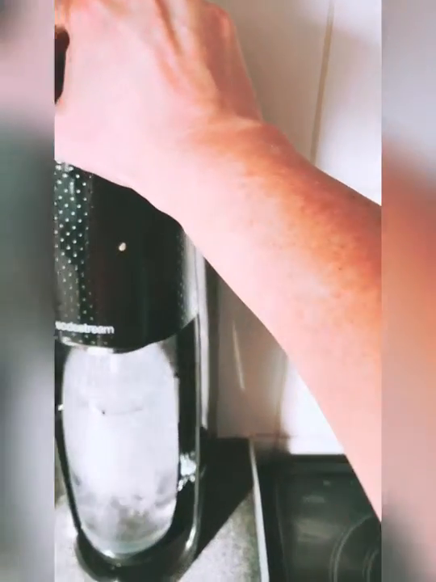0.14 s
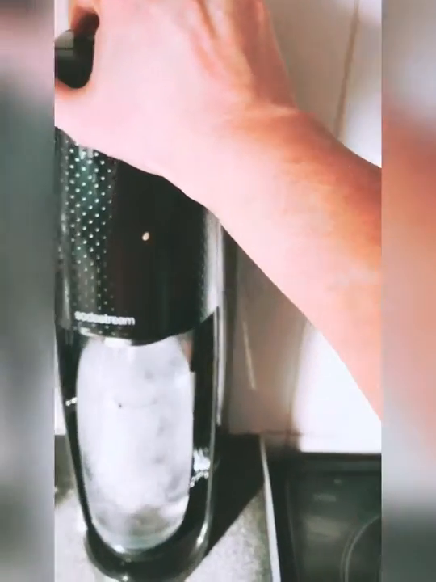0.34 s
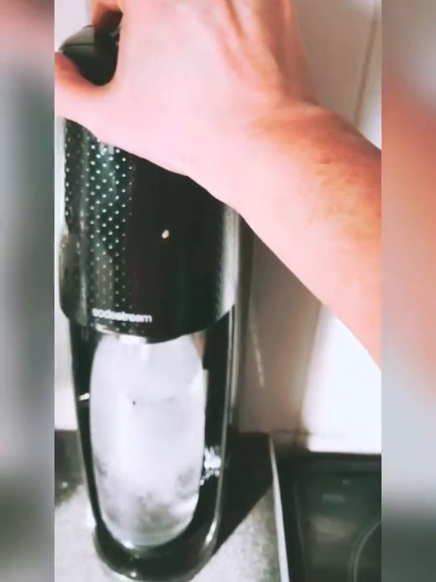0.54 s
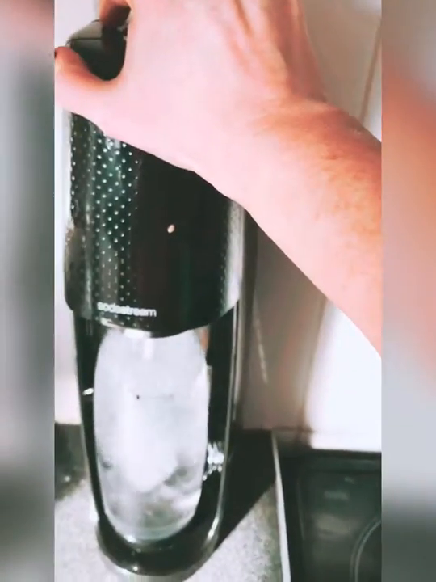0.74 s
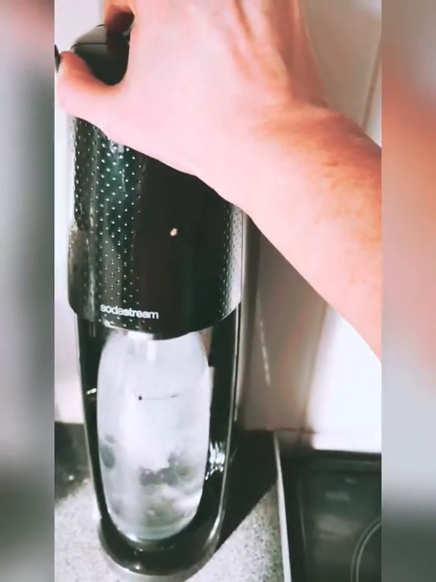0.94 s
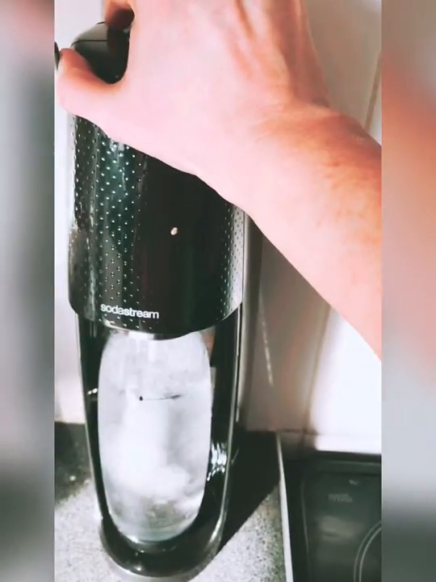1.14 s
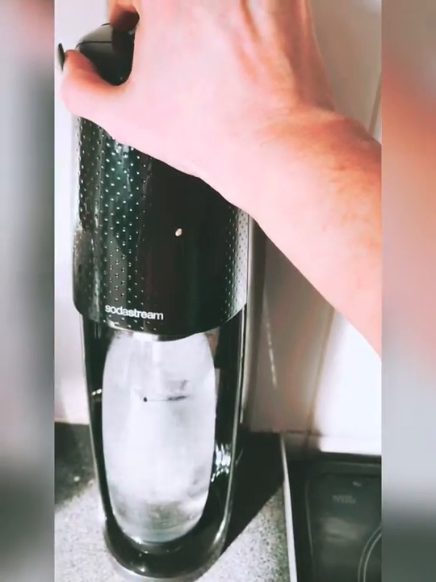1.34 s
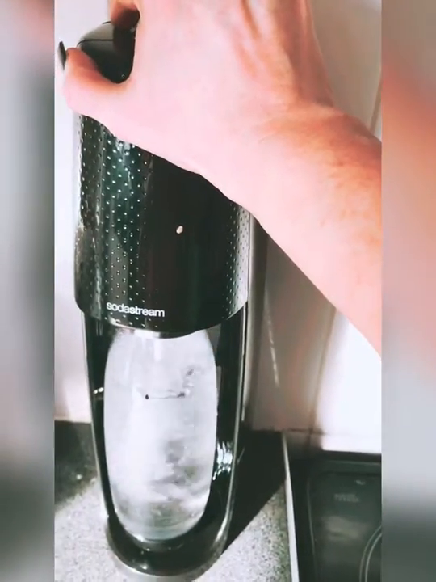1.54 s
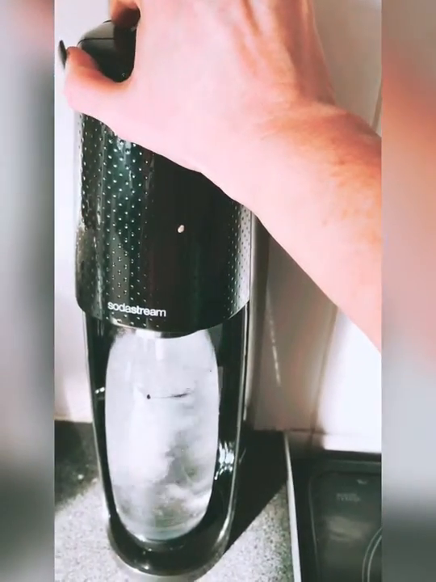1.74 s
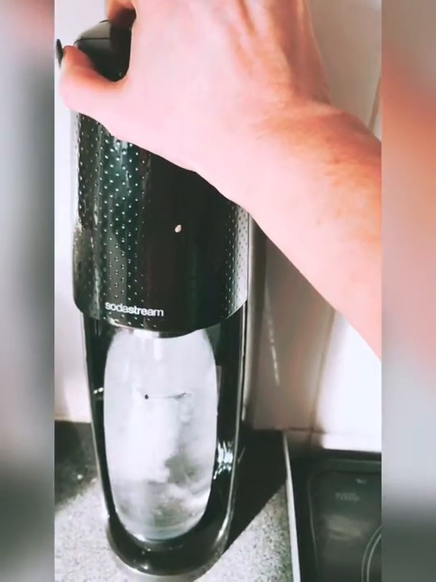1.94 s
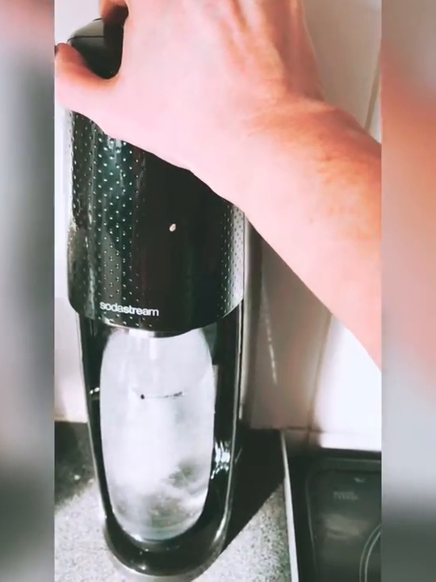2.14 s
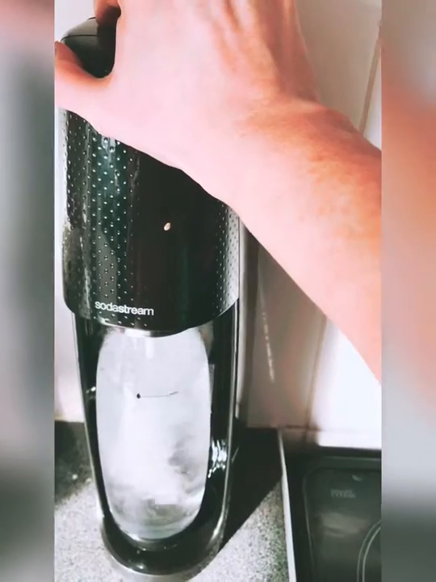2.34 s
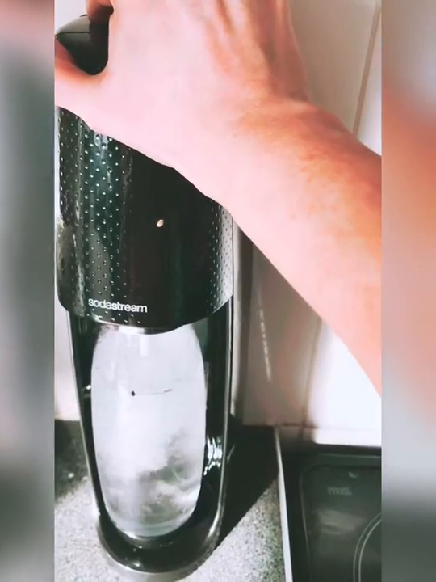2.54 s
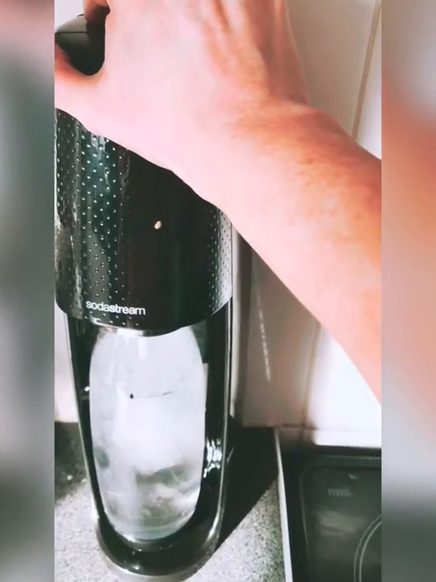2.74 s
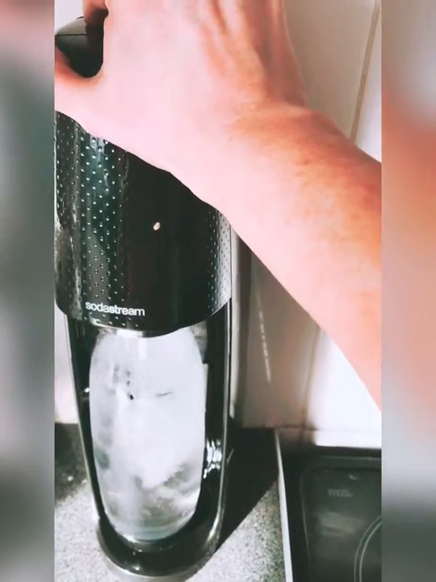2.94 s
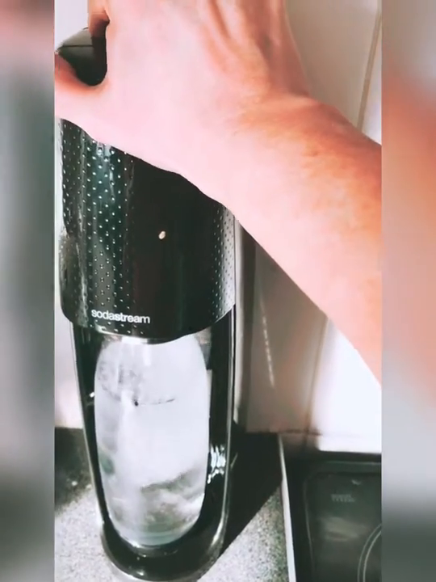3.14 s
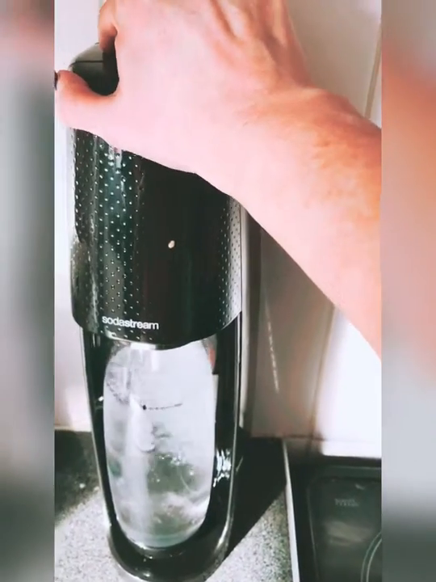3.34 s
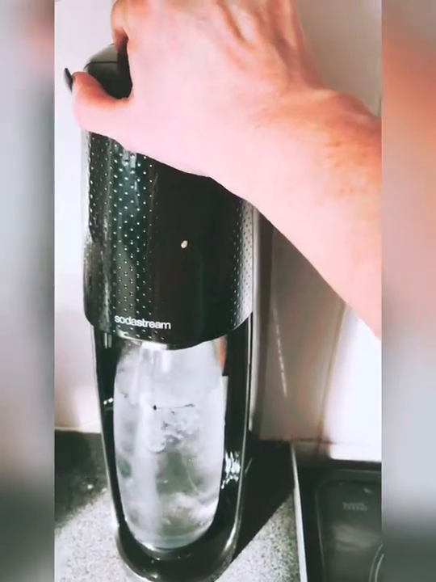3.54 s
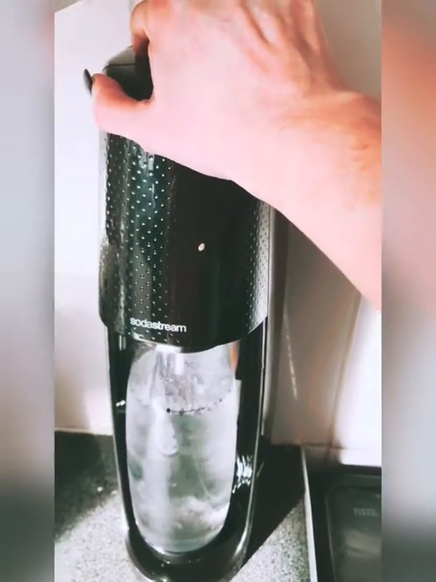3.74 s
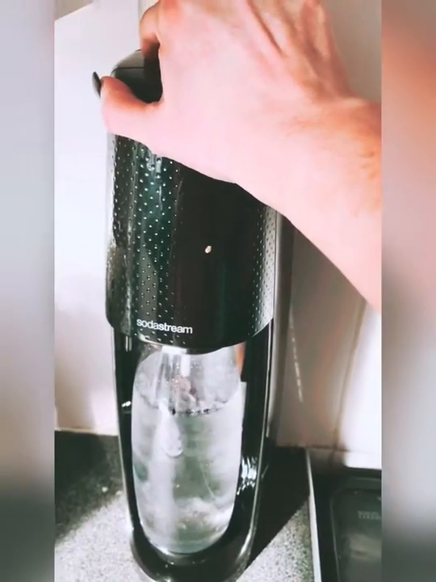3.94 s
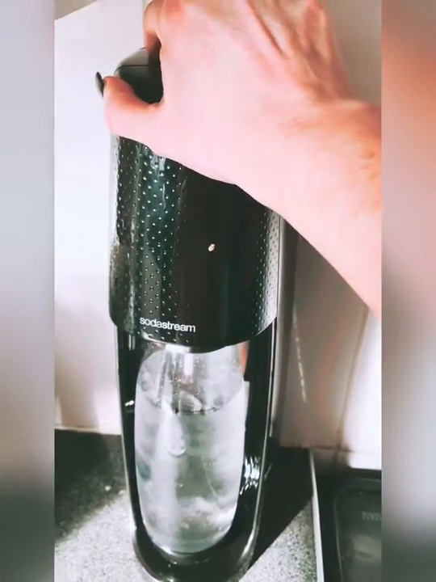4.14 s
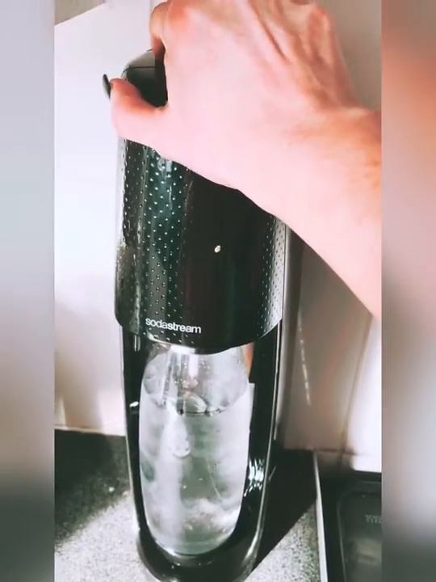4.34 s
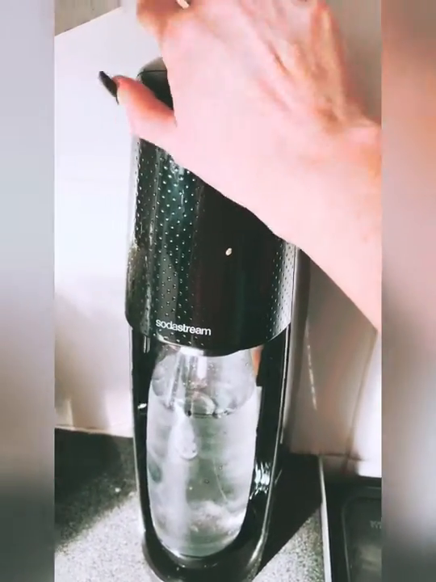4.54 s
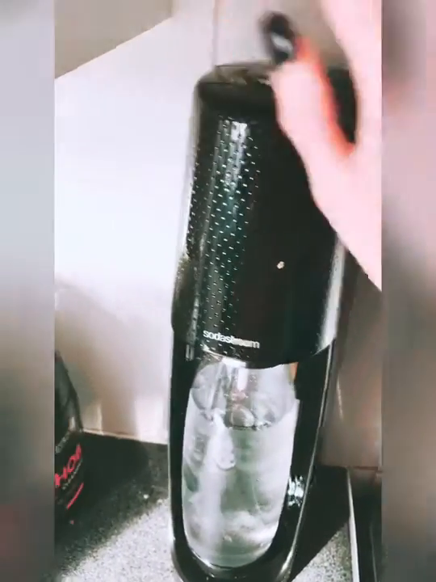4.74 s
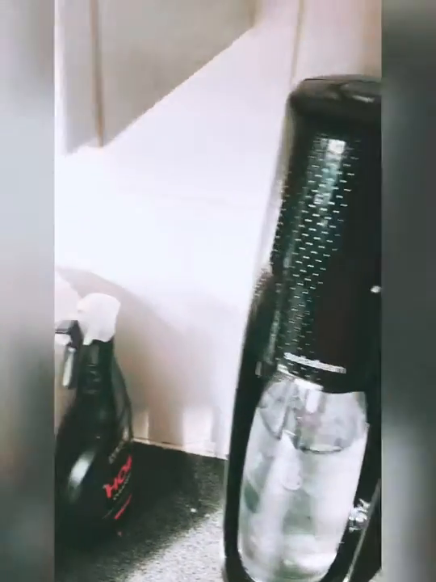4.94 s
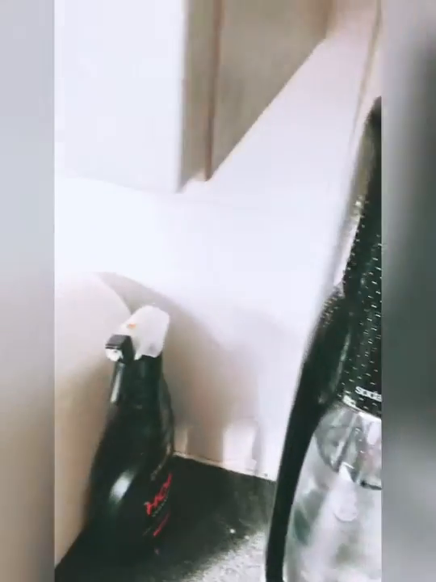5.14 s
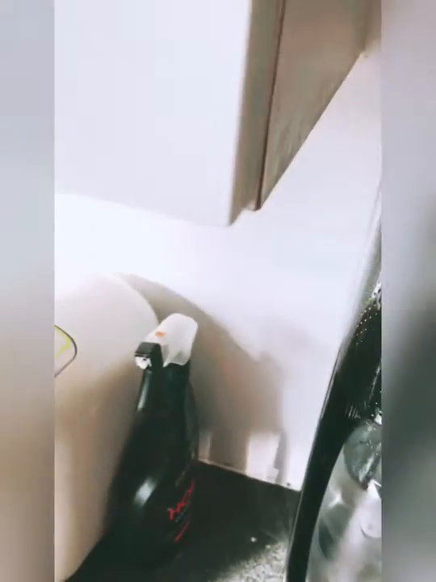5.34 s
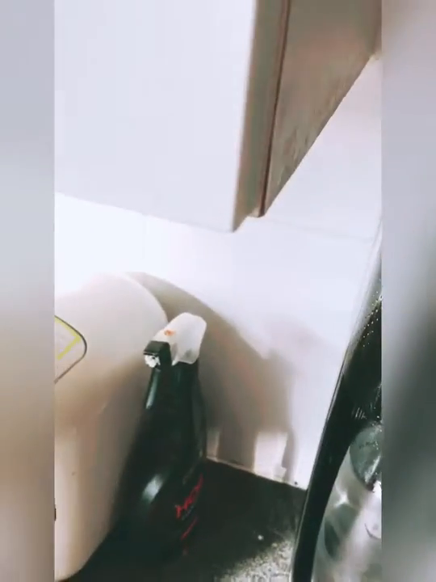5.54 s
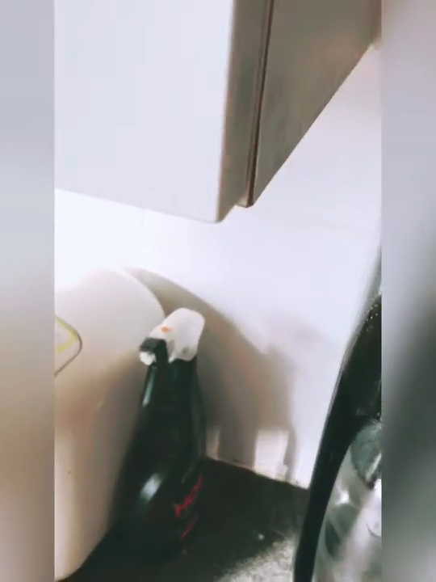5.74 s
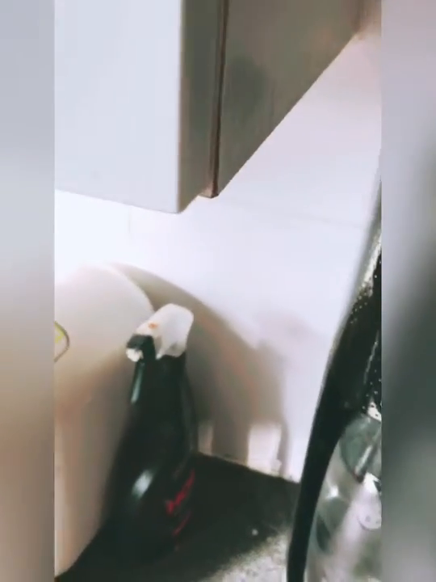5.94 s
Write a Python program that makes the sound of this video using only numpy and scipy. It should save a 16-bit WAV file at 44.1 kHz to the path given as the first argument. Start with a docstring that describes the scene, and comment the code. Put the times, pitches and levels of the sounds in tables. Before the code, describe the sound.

A home drink carbonator roars and gurgles for three seconds, spurts off, then hisses quietly while a hand clicks and bumps its plastic housing.

```python
"""Home carbonator charging a bottle

A gas jet shatters into ringing bubbles and short squeaks, and churns the water against the bottle wall.
Gas hisses through neck, air space and valve as noise in narrow resonances, and fades slowly after the jet.
A hand knocks the plastic: clicks and scuffs ring in the wall modes. The kitchen rumbles softly beneath.
"""
import sys
import numpy as np
from scipy import signal
from scipy.fft import rfft, irfft
from scipy.io import wavfile

SR = 44100
rng = np.random.default_rng(int(sys.argv[2]) if len(sys.argv) > 2 else 0)


def wav_record(signal):
    """Record a signal, one row per channel, as 16-bit PCM in the file named by sys.argv[1]."""
    frames = np.transpose(np.atleast_2d(signal))
    bounded = np.clip(frames, -1, 1)
    # unit amplitude maps onto the largest positive 16-bit level
    quanta = np.round(bounded * 32767).astype(np.int16)
    wavfile.write(sys.argv[1], SR, quanta)


N = 268995

# Kitchen hum and rumble, spectrum outline: frequency_hz, relative_level_db
ROOM_SPECTRUM = [(12, -37), (20, -5), (92, 5.5), (274, -7.5), (303, -22), (362, -11), (441, -8), (632, -6),
                 (709, -4.5), (1000, -45), (1300, -34), (2200, -120)]
ROOM_DB = -67

# Hand on the plastic: start_s, force_db, lowest_hz, highest_hz, scuff_decay_s, tick_db (relative to force)
HAND_KNOCKS = [(3.327, -25.5, 300, 1000, 0.022, -12), (3.43, -30.5, 300, 1400, 0.011, -3),
               (3.499, -20.5, 300, 490, 0.016, -28), (4.015, -29, 222, 800, 0.031, -20),
               (4.099, -33.5, 220, 623, 0.037, -26), (4.342, -42, 240, 453, .010, -30),
               (4.622, -34.5, 219, 800, 0.02, -8), (4.658, -33.5, 220, 400, 0.014, -24)]

# Resonances of the bottle wall, then of its base on the worktop: frequency_hz, nominal_width_hz, relative_level_db
WALL_DEEP_MODES = [(261.5, 19, 4.5), (320, 48, -4.5), (423, 26, -11)]
WALL_UPPER_MODES = [(580, 20.7, 4.5), (803, 35, 8), (895, 190, -2)]
BASE_MODES = [(96, 33, 0), (135, 14, 0)]
# Churn of water against the wall: time_s, lowest_mode_db, next_deep_modes_db, upper_modes_db, base_db
CHURN_LEVELS = [(0.0, -57, -59, -45, -63), (0.25, -51, -54.5, -48.5, -65.5), (0.55, -62, -52.5, -47, -62.5),
                (1.0, -61, -51.5, -49, -66), (1.3, -59.5, -59, -47.5, -65), (1.6, -64.5, -66.5, -51, -71),
                (2.2, -68, -54, -50, -70), (2.42, -52.5, -57.5, -43, -60), (2.62, -55, -58, -47, -59),
                (2.72, -67, -66, -50.5, -77), (2.95, -86, -58.5, -49, -75), (3.2, -63, -58.5, -53, -60),
                (3.3, -75, -74, -59, -66)]
# Water sloshing to rest: time_s, level_db
SETTLING_LEVELS = [(3.25, -84), (3.4, -61), (3.6, -60), (3.9, -67), (4.4, -77), (6.1, -77)]
# Slugs of water thump the wall and lift the deep modes: peak_s, lift_db, swell_s
WATER_SLUGS = [(0.31, 15, 0.037), (1.0, 9, 0.034), (1.36, 2, 0.027), (1.7, 9, .03), (2.42, 6, 0.034),
               (3.19, 12, .03)]
SLUG_FALL_S, SHOULDER_FOLLOWS = 0.037, 0.46  # collapse; share of the lift in the next deep modes

# Gas flow: time_s, neck_hiss_db, valve_hiss_db, air_space_gurgle_db
GAS_FLOW = [(0.0, -35, -36, -40), (0.15, -40.5, -35, -45), (0.25, -33, -34.5, -42),
            (0.5, -35, -34.5, -40.5), (0.72, -40, -35, -46.5), (1.0, -31.5, -34.5, -40),
            (1.3, -32.5, -34, -39.5), (1.55, -35, -34, -43), (2.4, -34, -34.5, -41.5),
            (2.7, -36.5, -34.5, -41.5), (2.82, -34.5, -38, -44.5), (3.28, -38, -38, -42),
            (3.4, -38.5, -38, -48), (4.15, -40.5, -40, -47.5), (4.9, -43, -41.5, -50.5),
            (5.3, -41, -42.5, -53), (6.1, -41.5, -44, -50)]
# Resonances of bottle neck, air space and valve: frequency_hz, nominal_width_hz, relative_level_db
NECK_MODES = [(805, 50, -25.5), (1496, 35, 3.5), (1616, 64, -4.5), (1711, 33, -14), (1865, 46, -2.5),
              (1950, 88, -13), (2138, 37, -16)]
AIR_SPACE_MODES = [(1000, 200, -20), (1072, 60, -4), (1133.4, 54, 2.5), (1250, 70, -5), (1324, 55, -1.5)]
VALVE_MODES = [(2354, 44, -25), (2590, 74, -17.5), (2685, 27, -17.5), (3380, 38, -16.5), (3460, 63, -20),
               (3570, 45, -19), (3920, 90, -30), (4060, 44, -25), (4396, 110, -14.5), (4506, 79, -21.5),
               (4648, 100, -6), (5060, 48, -0.5), (5104, 37, -5), (5308, 85, 0), (5474, 52, -9.5),
               (5780, 150, -14.5), (6100, 82, -16.5), (6200, 140, -18), (6684, 78, -14.5),
               (7250, 140, -18.5), (8334, 126, -8.5), (8945, 72, -7), (9140, 160, -2), (9610, 35, -10),
               (9816, 276, -5.5), (10150, 84, -27), (10930, 270, -13), (11100, 72, -14), (11540, 97, -8.5),
               (12060, 210, -19), (11860, 110, -15), (12220, 180, -7.5), (12850, 153, -3.5),
               (12900, 200, -19), (13400, 140, -33)]
NECK_BED_DB, VALVE_BED_DB = -27, -10.5  # broad noise, relative to the resonances
TOP_DB = -17  # mean level of the highest valve hiss, relative to its resonances
# Gulps of gas break the surface and lift the gurgle: peak_s, lift_db, swell_s
GAS_GULPS = [(1.09, 6.5, 0.02), (1.22, 6.5, 0.032), (1.3, 7, 0.039), (1.4, 8, 0.037), (1.47, 7, 0.022),
             (1.6, 7, 0.02), (1.69, 10.5, 0.032), (1.82, 8.5, 0.031), (1.93, 9.5, 0.031), (2.0, 1.5, 0.025),
             (2.1, 8, 0.035), (2.3, 3, .02), (2.36, 6.5, 0.022), (2.69, 6, 0.043)]
GULP_FALL_S, NECK_FOLLOWS = 0.015, 0.65  # collapse; share of the lift in the neck

# Clearest air pockets squeaking out of the cloud: centre_s, pitch_hz, peak_db, half_length_s
CLEAR_SQUEAKS = [(0.01, 3880, -26, 0.01), (0.057, 3570, -21, 0.0081), (0.123, 3880, -32, 0.04),
                 (0.448, 3790, -30, 0.02), (0.542, 3010, -33, 0.014), (1.13, 3120, -30, 0.012),
                 (1.156, 6460, -28, 0.022), (1.235, 3880, -30, 0.0116), (1.334, 8530, -28.5, 0.011),
                 (1.395, 8270, -29, 0.016), (1.635, 8180, -29.5, 0.021), (1.814, 6550, -34, 0.014),
                 (2.036, 5600, -24, 0.011), (2.235, 4480, -32.5, 0.042), (2.532, 6460, -32, 0.019),
                 (2.764, 5080, -32, 0.02), (2.889, 6130, -30.5, 0.014), (2.981, 7130, -27.5, 0.016),
                 (3.07, 6400, -32.5, 0.046), (3.173, 6530, -26.5, 0.011)]
# Fainter pockets at random; their highest peak is relative to the middle bubbles
FAINT_SQUEAKS, FAINT_UNTIL_S, FAINT_OVER_JET_DB, FAINT_HALF_S = 45, 3.25, 5.5, 0.016
# The last spurt: a swarm of pockets whose pitch slides down; level is that of the highest peak
SPURT_POCKETS, SPURT_START_S, SPURT_TAKES_S = 18, 3.205, 0.1
SPURT_FROM_HZ, SPURT_TO_HZ, SPURT_DB, SPURT_HALF_S = 4300, 2940, -30.5, 0.009

# Underwater jet in surges, a last spurt and the shut-off: time_s, large_bubbles_db, middle_bubbles_db, fine_bubbles_db
JET_LEVELS = [(0.0, -50, -39, -50), (0.1, -45.5, -41.5, -52), (0.21, -56, -40, -46), (0.3, -45, -38, -51),
              (0.6, -50, -48.5, -50), (1.02, -57, -46.5, -59), (1.1, -44, -42.5, -42),
              (1.28, -48.5, -45.5, -46.5), (1.52, -56, -50.5, -48), (1.62, -51.5, -45, -48.5),
              (1.78, -49, -43, -45.5), (1.95, -49, -45, -46), (2.4, -50, -42, -41.5),
              (2.62, -50, -45.5, -46.5), (2.78, -50.5, -45, -51.5), (2.9, -51, -48.5, -48.5),
              (3.07, -50, -47.5, -40.5), (3.19, -53, -53.5, -48), (3.21, -48, -42, -41.5),
              (3.28, -49.5, -44, -56), (3.36, -59, -63, -64), (3.55, -74, -86, -75)]
# Pitch of the three bubble sizes, with the ends of the range: pitch_hz
BUBBLE_PITCHES = [1907, 3190, 4380, 6930, 10410]
# Resonances of the shell around the bubbles: frequency_hz, width_hz, added_level_db
SHELL_MODES = [(2687, 65, -10), (3080, 43, 3.5), (3880, 44, -5), (4560, 98, -10), (5140, 74, -39),
               (6570, 86, -10), (8300, 160, 3)]
# The jet sputters in all sizes at once, negative lifts being dips: peak_s, lift_db, swell_s
JET_SPUTTERS = [(0.08, 3.5, .02), (0.27, 1.5, .02), (1.06, 8, .01), (1.14, 2.5, .015), (1.23, 3, .02),
                (1.33, 0.5, 0.028), (1.4, -2.5, 0.012), (1.63, -1, 0.0094), (2.05, 3, .015),
                (2.32, 2.5, 0.017), (2.8, 2.5, .01), (2.92, 2, .015), (2.99, 2.5, 0.018), (3.05, 2.5, .015),
                (3.1, 1, .01), (3.17, 3, 0.0073), (3.256, 3, .01), (3.328, 6, .006), (3.43, 6, .005)]
SPUTTER_FALL_S = 0.01

# Resonances shaded as the listening point turns away: frequency_hz, width_hz, share_lost (0-1)
SHADED_BANDS = [(1880, 230, 0.33), (2090, 250, 0.7), (2620, 120, .55), (4620, 500, .2), (8260, 250, 0.44),
                (12750, 400, 0.4)]
TURN_START_S, TURN_TAKES_S = 4.87, 0.3

CUTOFF_HZ = 15760


def from_db(db):
    """Amplitude gain of a level in dB."""
    return 10 ** (np.asarray(db) / 20)


def rms_one(x):
    """Sound scaled to rms 1."""
    return x / np.sqrt(np.mean(x ** 2) + 1e-20)


def in_time(rows, fade_db=0):
    """Columns at every sample; past the last row they drop by fade_db within a tenth of a second."""
    s, *columns = np.transpose(rows)
    t = np.arange(N) / SR
    return [np.interp(t, s, c) - fade_db * np.clip((t - s[-1]) * 10, 0, 1) for c in columns]


def drift(rate_hz):
    """Slow random wander of spread 1, changing about rate_hz times a second."""
    # Drawn at every 40th sample, after a run-in, then joined by straight lines
    r = np.exp(-80 * np.pi * rate_hz / SR)
    noise = rng.standard_normal(N // 40 + 2002)
    slow = signal.lfilter([1], [1, -2 * r, r * r], noise)[2000:]
    return np.interp(np.arange(N) / 40, np.arange(len(slow)), rms_one(slow))


def lifts(rows, fall_s):
    """Each event swells to its lift in dB and collapses."""
    t, out = np.arange(N) / SR, np.zeros(N)
    for s, lift_db, swell_s in rows:
        near = slice(max(int((s - 0.25) * SR), 0), int((s + 0.25) * SR))
        side_s = np.where(t[near] < s, swell_s, fall_s)
        out[near] += lift_db * np.exp(-((t[near] - s) / side_s) ** 2)
    return out


def resonate(x, hz, width_hz):
    """Two-pole resonance with gain 1 at its peak."""
    r = np.exp(-np.pi * width_hz / SR)
    poles = [1, -2 * r * np.cos(2 * np.pi * hz / SR), r * r]
    return signal.lfilter([(1 - r * r) / 2, 0, (r * r - 1) / 2], poles, x)


def band(x, low_hz, high_hz, order=3):
    """Butterworth band-pass."""
    return signal.sosfilt(signal.butter(order, [low_hz, high_hz], "band", fs=SR, output="sos"), x)


def hiss(modes, flutter_db, flutter_hz):
    """Turbulence ringing in steep resonances, each of which flutters on its own; rms 1."""
    white, out = rng.standard_normal((3, N)), 0
    for k, (hz, width_hz, level_db) in enumerate(modes):
        # Two wider passes in a row give steeper skirts
        once = resonate(white[k % 3], hz, 1.85 * width_hz)
        steep = resonate(once, hz, 1.85 * width_hz)
        out = out + from_db(level_db + flutter_db * drift(flutter_hz)) * steep
    return rms_one(out)


def kitchen():
    """Steady low rumble of the room: noise shaped in its spectrum."""
    hz = np.maximum(np.arange(N // 2 + 1) * SR / N, 1)
    outline_hz, outline_db = np.transpose(ROOM_SPECTRUM)
    shape_db = np.interp(np.log(hz), np.log(outline_hz), outline_db)
    rumble = irfft(rfft(rng.standard_normal(N)) * from_db(shape_db), N)
    return from_db(ROOM_DB) * rms_one(rumble)


def knocks(damping=0.69):
    """A click and a ragged, dying scuff ring in the wall modes; a tick rides on top."""
    push, tick, t = np.zeros(N), np.zeros(N), np.arange(SR // 5) / SR
    ragged = from_db(3.7 * drift(67.0))
    for s, level_db, low_hz, high_hz, scuff_s, tick_db in HAND_KNOCKS:
        at = round(s * SR)
        span = slice(at, at + len(t))
        click = np.exp(-t / 0.0006)
        scuff = np.exp(-t / scuff_s) * rng.standard_normal(len(t)) * ragged[span]
        contact = from_db(level_db) * (click + 0.95 * scuff)
        push[span] += band(contact, low_hz, high_hz, order=2)
        tick[span] += from_db(tick_db) * band(contact, 1500, 3800)
    rings = sum(from_db(db) * resonate(push, hz, damping * width_hz)
                for hz, width_hz, db in WALL_DEEP_MODES + WALL_UPPER_MODES)
    return rings + 0.48 * push + tick


def bottle():
    """The churning water shakes the wall modes as fluttering noise; slugs of water come in lumps."""
    belly_db, shoulder_db, upper_db, base_db = in_time(CHURN_LEVELS, fade_db=60)
    slug_db = lifts(WATER_SLUGS, SLUG_FALL_S)
    belly = hiss(WALL_DEEP_MODES[:1], flutter_db=4.0, flutter_hz=31.0)
    shoulder = hiss(WALL_DEEP_MODES[1:], flutter_db=2.3, flutter_hz=12.0)
    upper = hiss(WALL_UPPER_MODES, flutter_db=0.3, flutter_hz=25.0)
    base = hiss(BASE_MODES, flutter_db=2.5, flutter_hz=5.6)
    settling_gain = from_db(in_time(SETTLING_LEVELS)[0])
    slosh_gain = from_db(shoulder_db + SHOULDER_FOLLOWS * slug_db) + settling_gain
    deep = from_db(belly_db + slug_db) * belly + slosh_gain * shoulder
    return deep + from_db(upper_db) * upper + from_db(base_db) * base


def gas():
    """Gas rushing through bottle neck, air space and valve rings in their resonances, with broad noise beds."""
    neck_db, valve_db, space_db = in_time(GAS_FLOW)
    gulp_db = lifts(GAS_GULPS, GULP_FALL_S)
    white = rng.standard_normal((3, N))

    neck_bed = from_db(NECK_BED_DB) * rms_one(band(white[0], 960, 1870))
    neck = hiss(NECK_MODES, flutter_db=1.02, flutter_hz=12.0) + neck_bed
    space = hiss(AIR_SPACE_MODES, flutter_db=1.5, flutter_hz=73.0)

    valve_low = from_db(-0.87) * hiss(VALVE_MODES[:20], flutter_db=0.84, flutter_hz=5.0)
    valve_high = hiss(VALVE_MODES[20:], flutter_db=0.8, flutter_hz=5.1)
    valve_bed = from_db(VALVE_BED_DB) * rms_one(band(white[1], 2500, 18500))
    top_db = TOP_DB + 2.1 * drift(14.0) + 2.6 * drift(1.6)
    top = rms_one(band(white[2], 13700, 17800)) * from_db(top_db)
    valve = valve_low + valve_high + valve_bed + top

    return (from_db(neck_db + NECK_FOLLOWS * gulp_db) * neck
            + from_db(space_db + gulp_db) * space
            + from_db(valve_db + 0.53 * drift(21.0)) * valve)


def faint_pockets():
    """Faint air pockets at random while the jet runs, following the middle bubbles in level."""
    jet_s, _, middle_db, _ = np.transpose(JET_LEVELS)
    pockets = []
    for when, pitch, drop, length in rng.random((FAINT_SQUEAKS, 4)):
        s = FAINT_UNTIL_S * when
        peak_db = np.interp(s, jet_s, middle_db) + FAINT_OVER_JET_DB - 5.5 * drop
        pockets.append((s, 3000 * 2 ** (1.4 * pitch), peak_db, FAINT_HALF_S * (0.5 + length)))
    return pockets


def spurt_pockets():
    """The last spurt: later pockets are lower in pitch, with some scatter."""
    pockets = []
    for when, scatter, drop, length in rng.random((SPURT_POCKETS, 4)):
        slide_hz = SPURT_FROM_HZ * (SPURT_TO_HZ / SPURT_FROM_HZ) ** when
        hz = slide_hz * 2 ** (0.347 * (scatter - 0.5))
        s = SPURT_START_S + SPURT_TAKES_S * when
        pockets.append((s, hz, SPURT_DB - 5.0 * drop, SPURT_HALF_S * (0.5 + length)))
    return pockets


def squeaks(wobble=0.04, rise_octaves=0.042):
    """Each pocket sings one short, wavering tone that rises by a fraction of an octave."""
    out, waver = np.zeros(N + SR), 1 + wobble * drift(153.0)
    for s, hz, peak_db, half_s in CLEAR_SQUEAKS + faint_pockets() + spurt_pockets():
        part = np.linspace(-1, 1, round(2 * half_s * SR))
        at = max(round((s - half_s) * SR), 0)
        span = slice(at, at + len(part))
        pitch_hz = hz * 2 ** (rise_octaves * part / 2) * waver[span]
        phase = 2 * np.pi * np.cumsum(pitch_hz) / SR
        swell = np.cos(np.pi / 2 * part) ** 2
        out[span] += from_db(peak_db) * swell * np.sin(phase)
    return out[:N]


def jet(per_s=12000.0, cycles=58.0, patchy_db=1.5):
    """Bubbles pinch off at random and ring; each size comes in passing swarms and is heard through the shell."""
    large_db, middle_db, fine_db = in_time(JET_LEVELS, fade_db=62)
    levels_db = [large_db - 10.5, large_db, middle_db, fine_db, fine_db - 15.5]
    sizes = from_db(2.1 * np.minimum(rng.exponential(1, N), 5)) * rng.choice([-1, 1], N)
    born = rng.random(N) < per_s / SR
    dealt = rng.integers(0, 36, N)  # which of 36 pitches each bubble gets
    swarms_db = [1.45 * drift(10.6) for size in range(4)]
    out = 0
    for k, hz in enumerate(np.geomspace(BUBBLE_PITCHES[0], BUBBLE_PITCHES[-1], 36, endpoint=False)):
        # Blend the levels of the two neighbouring sizes
        place = np.interp(np.log(hz), np.log(BUBBLE_PITCHES), range(5))
        low = int(place)
        level_db = levels_db[low] + (place - low) * (levels_db[low + 1] - levels_db[low])
        pinches = sizes * born * (dealt == k) + 1e-18
        rings = rms_one(resonate(pinches, hz, 2.9 * hz / cycles))
        out = out + rings * from_db(level_db + patchy_db * drift(20.0) + swarms_db[low])
    out = out * from_db(2.0 * drift(3.9) + lifts(JET_SPUTTERS, SPUTTER_FALL_S))
    return out + sum(from_db(db) * resonate(out, hz, width_hz) for hz, width_hz, db in SHELL_MODES)


def corner(x, echo_db=-13, t60_s=0.12):
    """Tiles and worktop close by scatter the treble back as a dense, short tail."""
    t = np.arange(SR // 4) / SR
    treble = band(rng.standard_normal(len(t)), 1900, 22000)
    tail = treble * from_db(-60 * t / t60_s) * (t > 0.002)
    tail = tail / np.sqrt(np.sum(tail ** 2))
    return x + from_db(echo_db) * signal.fftconvolve(x, tail)[:N]


def turned_away(x):
    """Bands dim as the housing's openings leave the line of sight."""
    turn = np.clip((np.arange(N) / SR - TURN_START_S) / TURN_TAKES_S, 0, 1)
    for hz, width_hz, share in SHADED_BANDS:
        x = x - turn * share * resonate(x, hz, width_hz)
    return x


def scene():
    """All sources by the tiled corner, over the kitchen rumble; one channel."""
    carbonator = gas() + jet() + squeaks() + bottle() + knocks()
    return (turned_away(corner(carbonator)) + kitchen())[None]


def record(dry):
    """A steep elliptic low-pass cuts off the top."""
    return signal.sosfilt(signal.ellip(14, 0.3, 75, CUTOFF_HZ, fs=SR, output="sos"), dry)


dry = scene()
out = record(dry)
wav_record(out)
```